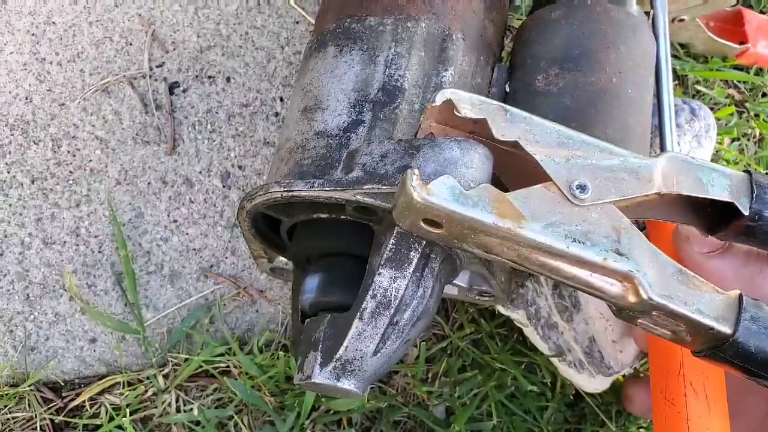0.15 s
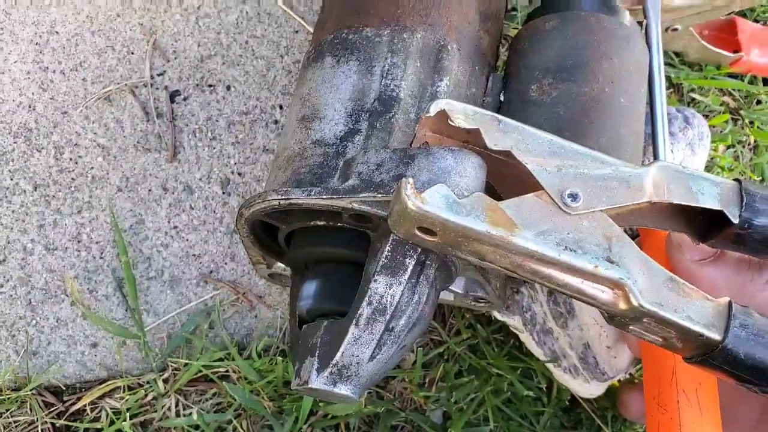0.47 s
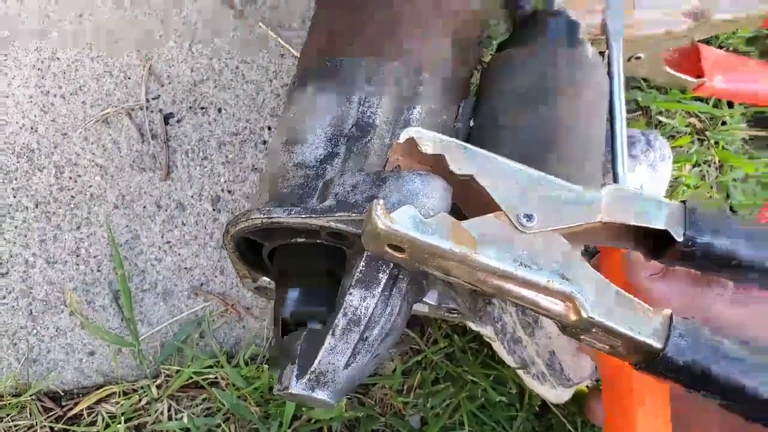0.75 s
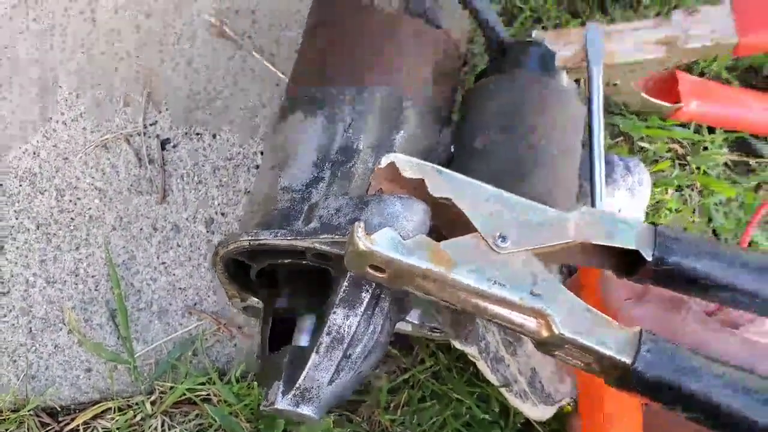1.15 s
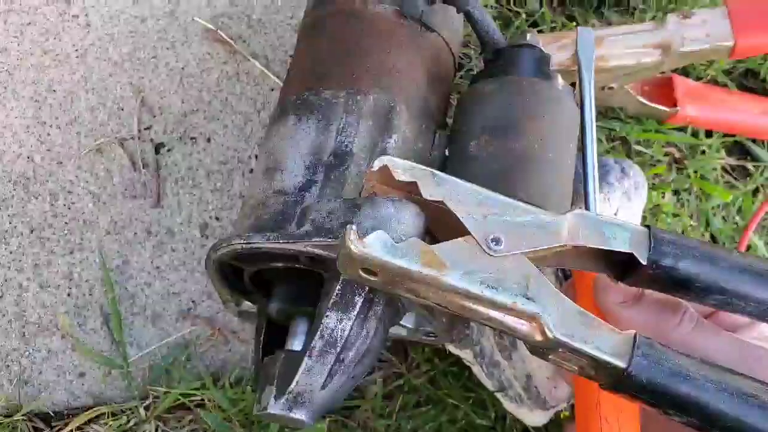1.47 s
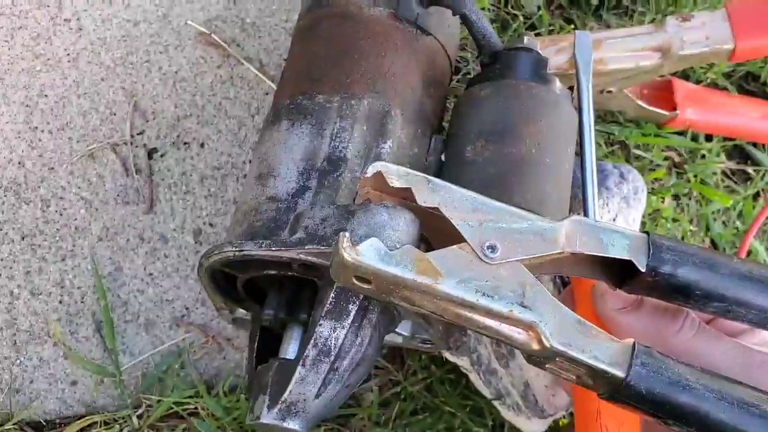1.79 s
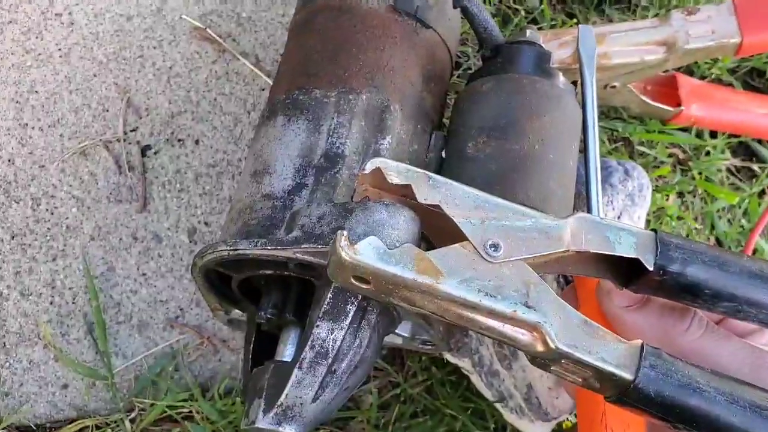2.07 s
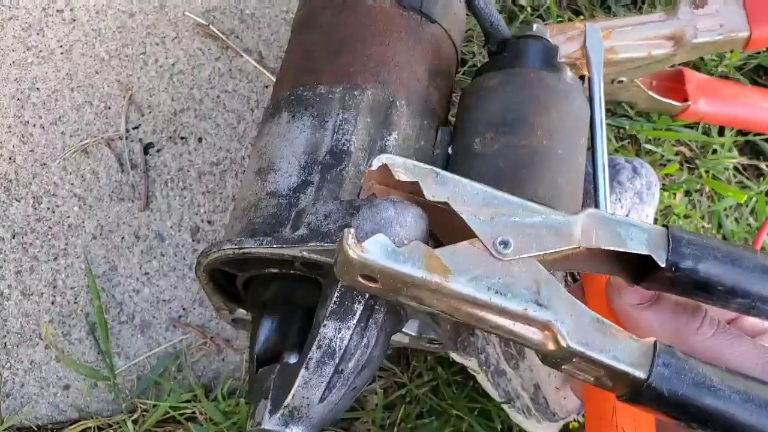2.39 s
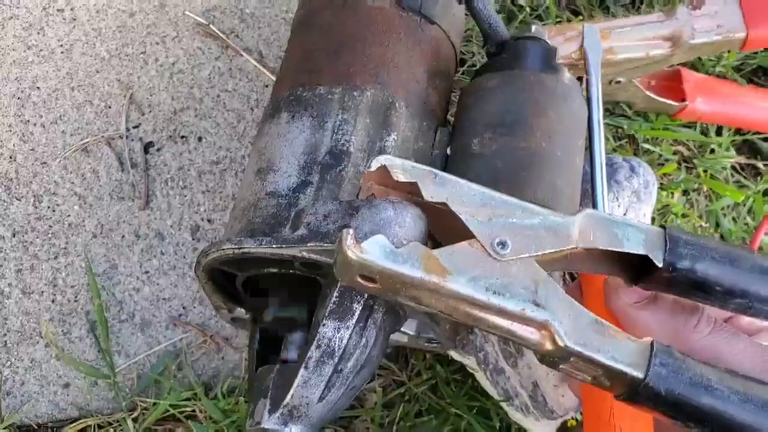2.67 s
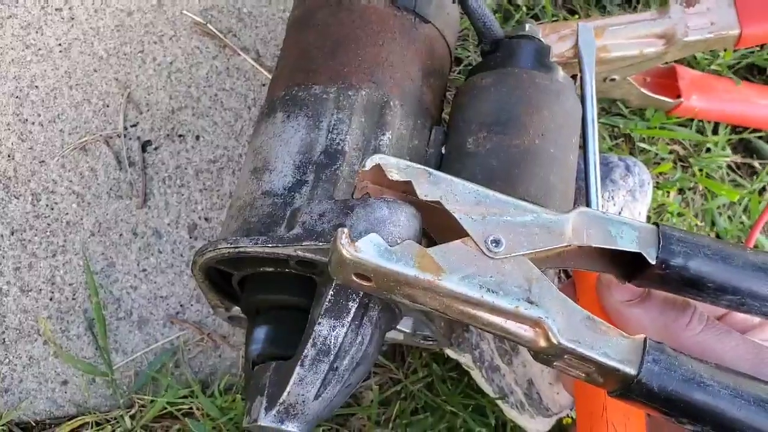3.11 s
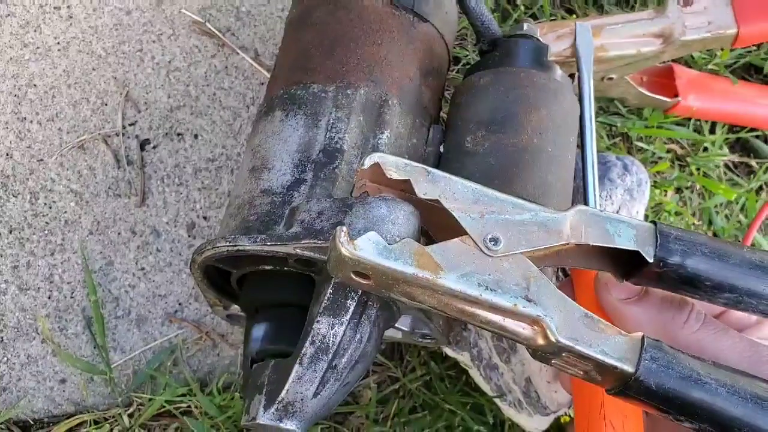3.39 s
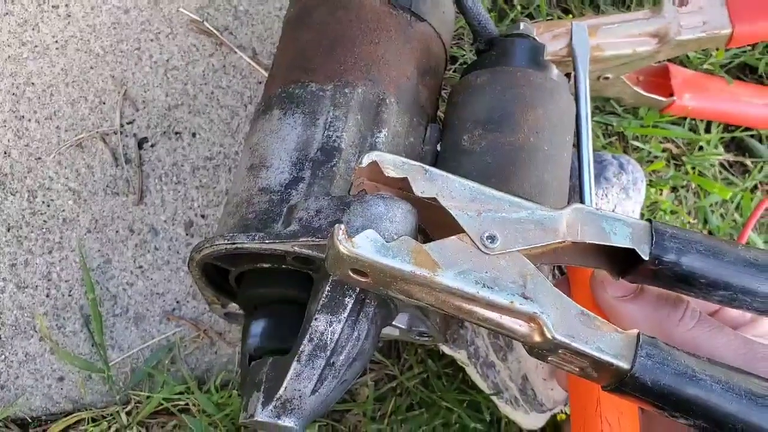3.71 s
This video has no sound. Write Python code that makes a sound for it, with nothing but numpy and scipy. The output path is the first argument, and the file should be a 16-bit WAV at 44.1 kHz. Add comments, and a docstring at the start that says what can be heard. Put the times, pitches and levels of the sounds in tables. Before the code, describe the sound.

A bare car starter motor whirs loudly, clatters, coasts down, then chatters and spins up again

```python
"""Outdoors on concrete lies a bare car starter motor, its terminals bridged by a screwdriver. It whirs fast,
the contact sputters and the drive gear hammers, then it coasts nearly to rest; a second try chatters and spins up.
One speed curve drives the shaft, mesh and commutator tones; noise shaped by resonances makes rattle and brush hiss.
Blows are decaying noise with a ringing sine, and both blows and brushes ring the iron housing.
Low open-air noise and a fading, unsteady sine, the drone of a far engine, lie underneath."""
import sys
import numpy as np
from scipy import signal
from scipy.fft import rfft, irfft, next_fast_len
from scipy.io import wavfile
from scipy.ndimage import uniform_filter1d, map_coordinates

SR = 44100
rng = np.random.default_rng(int(sys.argv[2]) if len(sys.argv) > 2 else 0)


def generate_wav(signal):
    """Clip the signal to [-1, 1] and save it as 16-bit WAV at the path in sys.argv[1]."""
    frames = np.transpose(np.atleast_2d(signal))
    scaled = np.clip(frames, -1, 1) * 32767
    pcm = np.round(scaled).astype(np.int16)
    wavfile.write(sys.argv[1], SR, pcm)


N = 169785

# Spectrum of a sharp metal contact. Each row: frequency in Hz, relative level in dB.
CRACK_COLOUR = [(700, -19.5), (2500, 1), (4700, -3), (5700, -6), (8300, 4.5), (10300, -0.5), (13000, -3.5)]

GRIND_PER_S, GRIND_RAD = 190, 1.05  # worn teeth and bars: phase knots per second, phase scatter in radians


def amp(db):
    """Level definition: 20 dB is a factor of ten in amplitude."""
    return 10 ** (np.asarray(db) / 20)


def unit(x):
    """Normalisation to a root-mean-square amplitude of 1."""
    return x / np.sqrt(np.mean(x ** 2) + 1e-20)


def along(points, hz):
    """Interpolation of (Hz, value) points on a logarithmic frequency axis."""
    f, v = np.transpose(points)
    return np.interp(np.log(hz + 1), np.log(f + 1), v)


def curve(rows):
    """Linear interpolation of (seconds, value) points, one value per sample."""
    return np.interp(np.arange(N) / SR, *np.transpose(rows))


def wobble(rate):
    """Band-limited randomness: a smooth curve through random knots, rate of them per second."""
    return map_coordinates(rng.standard_normal(N // 8), [np.arange(N) * rate / SR], mode="wrap")


def filtered(x, response):
    """Linear filtering: the spectrum of x times a response of frequency."""
    m = next_fast_len(N + SR // 2)
    spectrum = rfft(x, m) * response(np.fft.rfftfreq(m, 1 / SR))
    return irfft(spectrum, m)[..., :N]


def body(x, colour):
    """Minimum-phase filtering: a causal response of the given colour and unit energy."""
    size = 2048
    cepstrum = irfft(np.log(amp(along(colour, np.fft.rfftfreq(size, 1 / SR)))))
    # folding the cepstrum onto positive time makes the response causal
    cepstrum[1:size // 2] *= 2
    cepstrum[size // 2 + 1:] = 0
    h = irfft(np.exp(rfft(cepstrum)))
    return signal.fftconvolve(np.atleast_2d(x), h[None] / np.linalg.norm(h), axes=1)[:, :N]


def resonance(f, hz, width):
    """Damped oscillator: a band-pass response with unit gain at its centre."""
    return 1j * f * width / (hz * hz - f * f + 1j * f * width)


def tone(turns, order, rough, flutter_db, rate=60):
    """Order tone: a sine at a multiple of the turning rate, unsteady in phase and level."""
    phase = 2 * np.pi * order * turns + rough * wobble(rate)
    return np.sqrt(2) * np.sin(phase) * unit(amp(flutter_db * wobble(25.07)))


def knocks(turns, count):
    """Cyclic impacts: tooth contacts repeat, a little changed, with each turn of the output gear."""
    gear_ratio = 4.25  # armature turns per output turn
    teeth = turns / gear_ratio * count
    at = np.flatnonzero(np.diff(np.floor(teeth)) > 0)
    pattern = rng.standard_normal(count)[teeth[at + 1].astype(int) % count]
    change = 1 + 0.57 * rng.standard_normal(N)[:len(at)]
    out = np.zeros(N)
    out[at] = pattern * change * np.sqrt(1 / np.gradient(teeth)[at])  # even power at any contact rate
    return unit(out)


def gears(speed, turns, load, powered):
    """Forced vibration: knocks and rattle ring the housing; mesh grows with load and speed, shaft with speed."""
    # Gain of the whole whirr. Each row: time in seconds, gain in dB.
    whirr = [(0, -20.3), (.88, -19.5), (.95, -24.5), (1.25, -21.5), (1.5, -20.5), (1.72, -22.5), (1.9, -31),
             (1.98, -50), (2.38, -50.5), (2.41, -26), (2.8, -25.5), (3.26, -21), (3.85, -21)]
    # Tones of the shaft. Each row: multiple of shaft speed, level in dB before speed scaling.
    shaft_orders = [(1, -21.5), (2, -9), (3, -14.5), (5, -9.5), (6, -19.5)]
    # Tones of the meshing teeth, as multiples of shaft speed.
    mesh_orders = [7.33, 7.85]
    # Colour of the iron housing. Each row: frequency in Hz, relative level in dB.
    housing = [(60, -40.5), (180, -9), (280, -12.5), (420, -3), (580, -7), (770, 1), (1000, 2), (1220, 2.5),
               (1550, -11.5), (2200, -15), (3300, -27.5), (13000, -40)]
    # Case resonances, two stages each. Each row: frequency in Hz, width of a stage in Hz, relative level in dB.
    case_modes = [(800, 180, 11), (2630, 170, 2)]
    mesh_db, pattern_db, rattle_db, case_db = 4, -3.5, -0.9, -12  # relative gains
    shaft_power, coast_hum = 2.4, .8  # exponent of speed, share of shaft tone left without current
    soft_hz, hardness_power = 990, 0.64  # slow teeth meet softly

    pace = speed / speed.max()
    rattle = unit(rng.standard_normal((2, N)) * amp(2.6 * wobble(500) + 1.8 * np.sin(2 * np.pi * turns)))
    mesh = sum(tone(turns, k, GRIND_RAD, flutter_db=4, rate=GRIND_PER_S) * amp(along(housing, k * speed))
               for k in mesh_orders)
    mesh = pace ** 0.96 * load ** 0.52 * mesh
    shaft = sum(amp(db) * tone(turns, round(k), rough=0.11 * k, flutter_db=.5) for k, db in shaft_orders)
    shaft = shaft * pace ** shaft_power * np.maximum(powered, coast_hum)

    def case_response(f):
        return sum(amp(db) * resonance(f, hz, width) ** 2 for hz, width, db in case_modes)

    case = unit(filtered(rattle * amp(2 * wobble(40)), case_response))
    contacts = amp(rattle_db) * rattle + amp(pattern_db) * knocks(turns, count=128)
    hard = body(contacts, housing) + amp(mesh_db) * mesh
    soft = filtered(hard, lambda f: 1 / (1 + (f / soft_hz) ** 6))
    struck = soft + pace ** hardness_power * (hard - soft)
    return amp(curve(whirr)) * (struck + amp(case_db) * case + shaft)


def brushes(speed, turns, load, powered):
    """Friction: carbon on the commutator hisses, rings iron and holder, squeals; loaded bars whine roughly."""
    # Gain of all brush sound. Each row: time in seconds, gain in dB.
    brush_gain = [(0, -25.5), (.88, -25), (.95, -30.5), (1.2, -25.5), (1.3, -31), (1.5, -35.5),
                  (1.8, -48.5), (1.97, -73.5), (2.38, -72), (2.41, -28.5), (2.74, -36.5), (2.9, -30.5),
                  (3.08, -30), (3.35, -27), (3.85, -26)]
    # Colour of the scraping. Each row: frequency in Hz, relative level in dB.
    scrape_colour = [(300, -8.5), (1000, 7.5), (2300, 4), (3400, 1), (6400, -1.5), (8400, 4.5),
                     (11300, 0.5), (13000, -7.5)]
    # Response to the bar tones. Each row: frequency in Hz, relative level in dB.
    whine_colour = [(1700, 13), (2300, -1), (3150, 7), (3800, -10), (4600, 0), (6200, -9), (10500, -11),
                    (11200, 2), (12000, -14)]
    bars, whine_db = 29, -6  # commutator bars, relative gain
    squeal_hz, squeal_width_hz, squeal_db, squeal_flicker_db = 7564, 170, -4, 3  # width of each of two stages
    holder_hz, holder_width_hz, holder_db = 1798, 250, -8  # brush holder, likewise
    coast_ring = 1.4  # the ringing stands out as the motor slows

    pace = speed / speed.max()
    once_per_turn = (1 - pace) * 1.7 * np.sin(2 * np.pi * turns)
    grain_db = 1.3 * wobble(900) + 1.6 * wobble(70) + once_per_turn
    scrape = unit(rng.standard_normal((2, N)) * amp(grain_db))
    hiss = body(scrape, scrape_colour)
    hiss = hiss + (1 + coast_ring * (1 - pace) * (1 - powered)) * iron(hiss)
    whine = sum(share * tone(turns, k, GRIND_RAD, flutter_db=4.0, rate=GRIND_PER_S)
                * amp(along(whine_colour, k * speed))
                for k, share in [(bars, 1), (2 * bars, pace ** 2)])
    whine = np.sqrt(load) * whine
    holder = unit(filtered(scrape, lambda f: resonance(f, holder_hz, holder_width_hz) ** 2))
    squeal = filtered(rng.standard_normal((2, N)), lambda f: resonance(f, squeal_hz, squeal_width_hz) ** 2)
    squeal = unit(squeal * amp(squeal_flicker_db * wobble(14)))
    resonant = amp(squeal_db) * squeal * np.maximum(powered, .5) + amp(holder_db) * powered * pace * holder
    return amp(curve(brush_gain)) * (hiss + amp(whine_db) * whine + pace * resonant)


def burst(colour, t60, attack):
    """Impact excitation: decaying noise of rms 1, its colour and length scattered from blow to blow."""
    colour_scatter_db, length_scatter = 2.8, .22
    ring_db, ring_t60_s = -25, 0.091  # weaker, slower second decay
    t = np.arange(SR // 8) / SR
    colour = [(hz, db + rng.normal(0, colour_scatter_db)) for hz, db in colour]
    decay = amp(-60 * t / (t60 * rng.lognormal(0, length_scatter))) + amp(ring_db - 60 * t / ring_t60_s)
    envelope = (1 - np.exp(-(t / attack) ** 2)) * decay
    return np.array([unit(x) for x in body(envelope * rng.standard_normal((2, len(t))), colour)])


def chatter():
    """Repeated impact: as contact makes and breaks, the drive gear cracks, thuds and rebounds, and each blow
    rings with a clink."""
    # Blows of the drive gear. Each row: start in seconds, relative level of crack and clink in dB,
    # relative level of thud in dB.
    blows = [(0.903, -3, -35), (0.9442, -4, -16.5), (0.9525, -9, -14.5), (0.9604, -8.5, -15),
             (0.9879, -7, -11), (1.0141, -7.5, -16.5), (1.022, -16, -19.5), (1.029, -5, -12),
             (1.0515, -10, -23), (1.0826, -8, -12.5), (1.09, -5, -13), (1.0993, -12, -17),
             (1.1181, -12, -18), (1.1227, -9.5, -12), (1.155, -2.5, -20), (1.1613, -5, -13),
             (1.1701, -7, -23), (1.1958, -6.5, -11), (1.691, -30, -18), (1.7994, -44, -18),
             (1.893, -48, -35.5), (2.3899, -6, -13), (2.415, -4.5, -13), (2.4227, -13, -21),
             (2.438, -7, -20), (2.4549, -9, -9), (2.4633, -5.5, -18), (2.4817, -5, -15), (2.5083, -9, -10),
             (2.5166, -9, -17), (2.5368, -4.5, -12), (2.548, -8, -11.5), (2.563, -6, -22),
             (2.5958, -4.5, -16), (2.6124, -5, -14.5), (2.6314, -6, -37), (2.645, -4.5, -13),
             (2.6527, -16, -27), (2.6689, -8.5, -15), (2.6827, -4, -36), (2.7044, -4.5, -17.5),
             (2.7586, -4.5, -13), (2.767, -9, -22), (2.8, -8, -9.5), (2.817, -13, -18), (2.831, -5.5, -12),
             (2.8386, -6, -14), (2.8576, -10, -22), (2.8692, -5, -26), (2.8798, -6.5, -12.5),
             (2.9069, -6, -16), (2.9227, -9, -13), (2.9302, -8.5, -10.5), (2.9423, -7, -15),
             (2.959, -8, -18), (2.9691, -7.5, -17), (2.9824, -6, -13), (3.0109, -4, -18),
             (3.0255, -6.5, -13)]
    # Colour of the housing's thud. Each row: frequency in Hz, relative level in dB.
    thud_colour = [(50, -25), (130, -11), (250, -6), (400, 2), (560, -1), (760, 4), (1200, -1.5),
                   (1600, -13), (3000, -29.5)]
    crack_gain_db, crack_t60_s = -26, 0.011  # median decay time
    thud_gain_db, thud_t60_s = -18, 0.026  # likewise
    clink_hz, clink_gain_db, clink_t60_s = 2305, -20, 0.046  # mean pitch of the ring
    attack_s, rebound_s, rebound_db = 0.0013, 0.0085, -11  # mean delay and level of the rebound

    out = np.zeros((2, N + SR))
    for s, crack_db, thud_db in blows:
        rebound = (rebound_s * (.5 + rng.random()), rebound_db + rng.normal(0, 4.1))
        for delay, loss_db in [(0, 0), rebound]:
            crack = amp(crack_db + crack_gain_db) * burst(CRACK_COLOUR, crack_t60_s, attack_s)
            thud = amp(thud_db + thud_gain_db) * burst(thud_colour, thud_t60_s, attack_s)
            t = np.arange(crack.shape[1]) / SR
            clink = np.sin(2 * np.pi * clink_hz * rng.normal(1, 0.016) * t)
            clink = clink * amp(crack_db + clink_gain_db - 60 * t / clink_t60_s) * (1 - np.exp(-t / attack_s))
            out[:, round((s + delay) * SR):][:, :len(t)] += amp(loss_db) * (crack + thud + clink)
    return out[:, :N]


def sparks():
    """Random impulses: small sharp ticks of arcing while the contact sputters."""
    # Spells of sputtering. Each row: start in seconds, stop in seconds.
    sputter = [(.9, 1.21), (2.39, 2.71), (2.76, 3.04)]
    sparks_per_s, spark_db = 170, -35.5  # mean rate, gain
    t = np.arange(N) / SR
    arcing = sum((t > start) & (t < stop) for start, stop in sputter)
    ticks = unit((rng.random(N) < sparks_per_s / SR) * rng.uniform(-1, 1, N))
    return amp(spark_db) * body(ticks * arcing, CRACK_COLOUR)


def iron(x):
    """Modal resonance: the ringing that x raises in the high modes of the housing."""
    # High modes of the iron. Each row: frequency in Hz, gain in dB.
    iron_modes = [(2560, -6), (4270, -1.5), (4850, -3), (6080, -5.5), (7650, -6), (9500, -19.5)]
    width_hz = 344
    return filtered(x, lambda f: sum(amp(db) * resonance(f, hz, width_hz) for hz, db in iron_modes))


def rock():
    """Amplitude modulation: a bell-shaped envelope on a rough low tone, a soft bump as the motor nears rest."""
    centre_s, length_s, rock_hz, rock_db = 1.84, 0.084, 50.5, -34
    t = np.arange(N) / SR
    swell = np.exp(-((t - centre_s) / length_s) ** 2)
    return amp(rock_db) * swell * tone(t, rock_hz, rough=1, flutter_db=13)


def outdoors():
    """Superposition: low open-air noise and the unsteady drone of a far engine, which fades."""
    # Far engine. Each row: time in seconds, level in dB.
    drone_level = [(0, -29.5), (.85, -37), (1.15, -34.5), (1.75, -34), (2.05, -38), (2.5, -72)]
    # Colour of the open air. Each row: frequency in Hz, relative level in dB.
    air_colour = [(15, -48), (25, -20), (90, -14), (165, -12.5), (263, -28.5), (750, -27), (3330, -38.5),
                  (13000, -79.5)]
    drone_hz, air_db = 84.2, -40.5
    drone = amp(curve(drone_level)) * tone(np.arange(N) / SR, drone_hz, rough=0.054, flutter_db=2.5)
    return drone + amp(air_db) * body(rng.standard_normal((2, N)), air_colour)


def scene():
    """Torque and inertia: current flows and loads the gears while the armature gains speed."""
    # Armature speed in three stretches. Each row: time in seconds, speed in turns per second.
    first_run = [(0, 178), (.15, 188), (.3, 197), (.5, 206), (.88, 217)]
    coast_and_chatter = [(1.2, 154), (1.5, 115), (1.72, 64), (1.95, 7.7), (2.39, 7.4), (2.71, 44),
                         (2.755, 66.3), (3.04, 84)]
    second_run = [(3.1, 101), (3.16, 123), (3.25, 145), (3.33, 160), (3.5, 178), (3.7, 194), (3.85, 202)]
    # Stereo spread, treble only. Each row: frequency in Hz, gain of the side signal in dB.
    side_gain = [(3000, -80), (4200, -10), (5200, -5)]
    full_load, idle_load = 570, .03  # turns per second squared, share of full load

    speed = curve(first_run + coast_and_chatter + second_run)
    turns = np.cumsum(speed) / SR
    gain = np.gradient(speed) * SR / full_load
    states = np.array([np.clip(gain, idle_load, 1), gain > 0])
    load, powered = uniform_filter1d(states, size=SR // 50)  # smoothed over 20 ms
    motor = gears(speed, turns, load, powered) + brushes(speed, turns, load, powered)
    hits = chatter() + sparks()
    mid, side = motor + hits + iron(hits) + rock() + outdoors()
    side = filtered(side, lambda hz: amp(along(side_gain, hz)))
    return np.array([mid + side, mid - side])


def record(dry):
    """Saturation and band limiting: peaks clip hard, then a steep low-pass removes the top."""
    clip_level, top_hz = .82, 13130
    return filtered(np.clip(dry, -clip_level, clip_level), lambda hz: 1 / (1 + (hz / top_hz) ** 160))


dry = scene()
out = record(dry)
generate_wav(out)
```